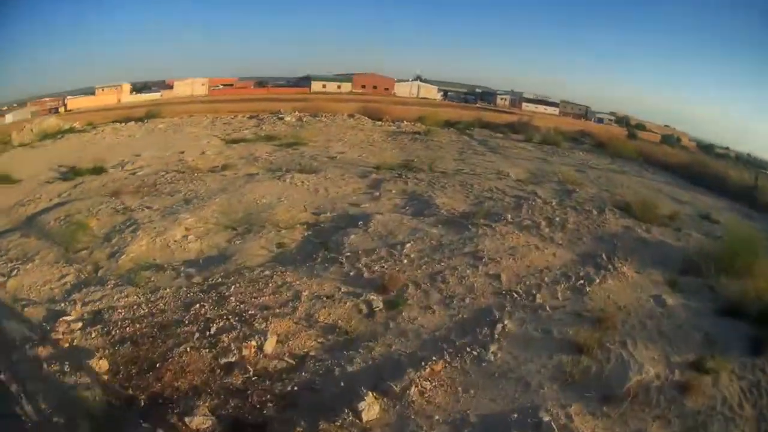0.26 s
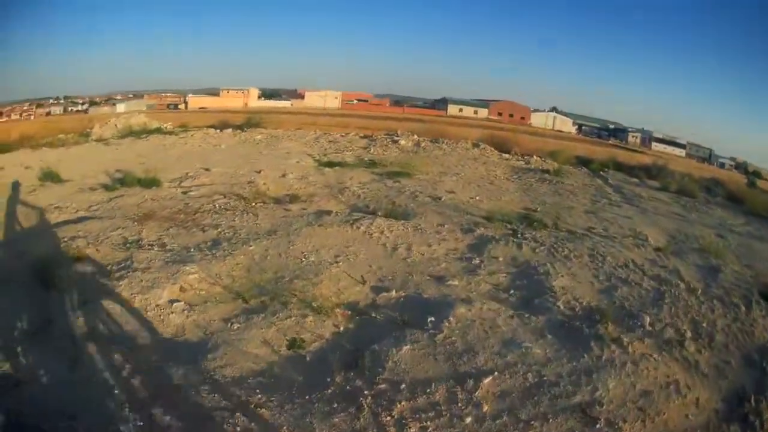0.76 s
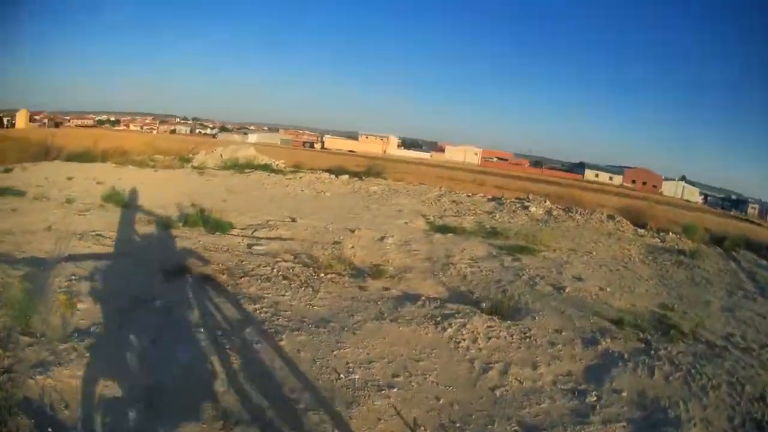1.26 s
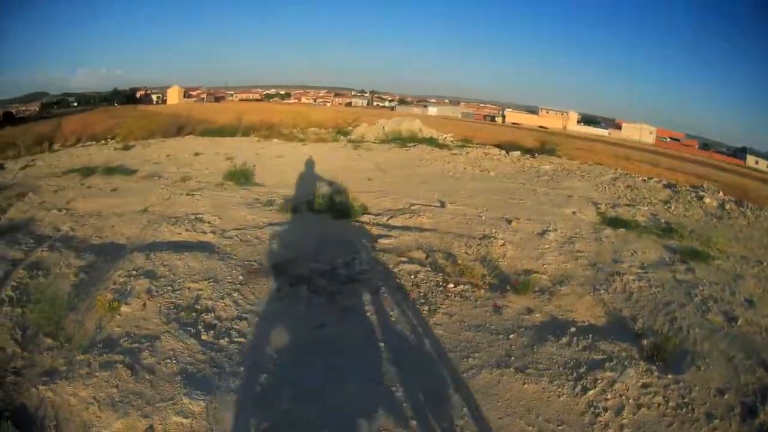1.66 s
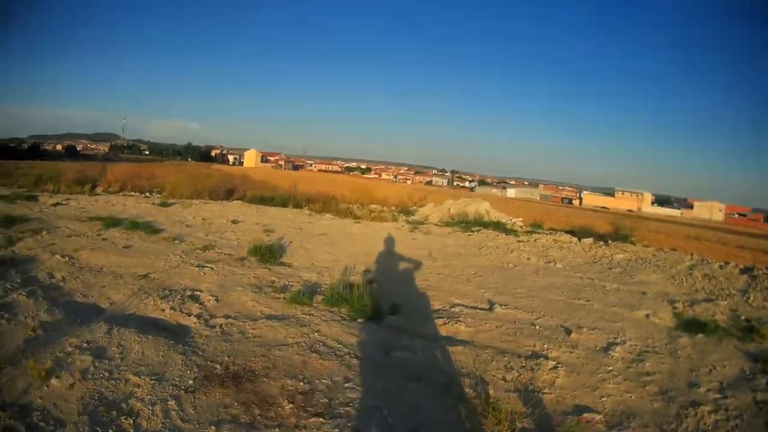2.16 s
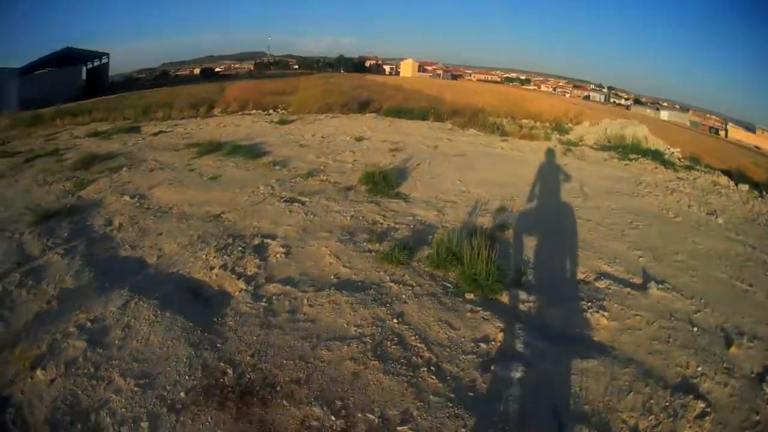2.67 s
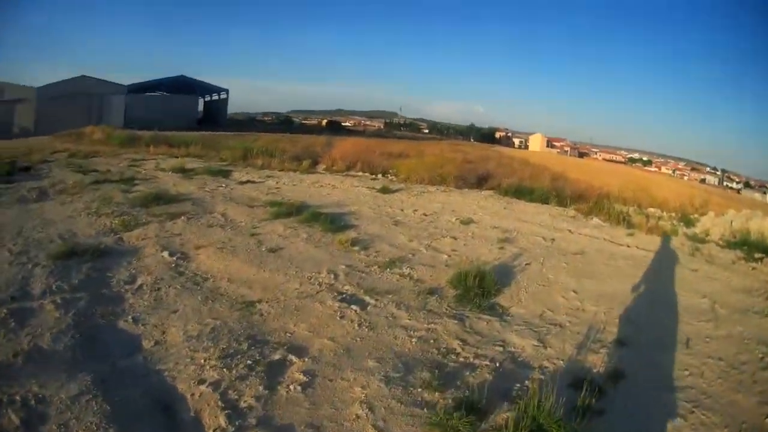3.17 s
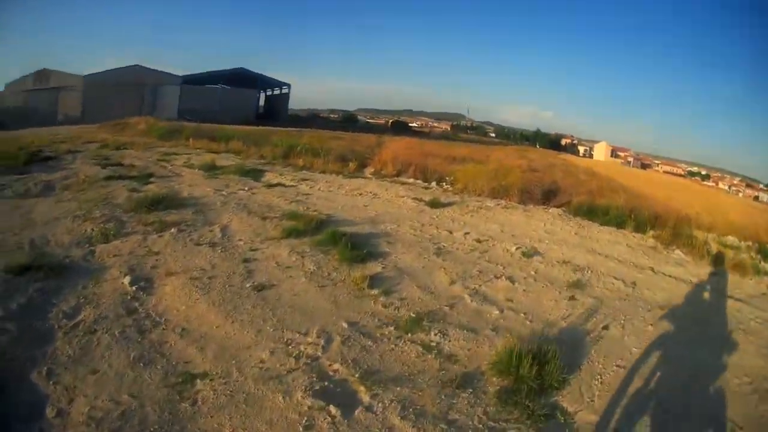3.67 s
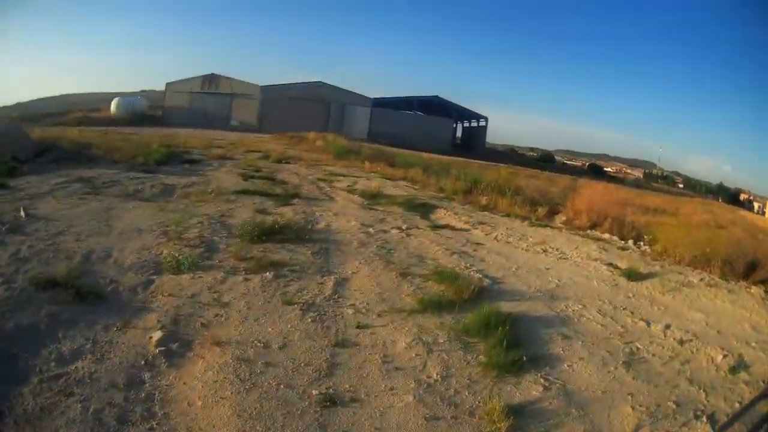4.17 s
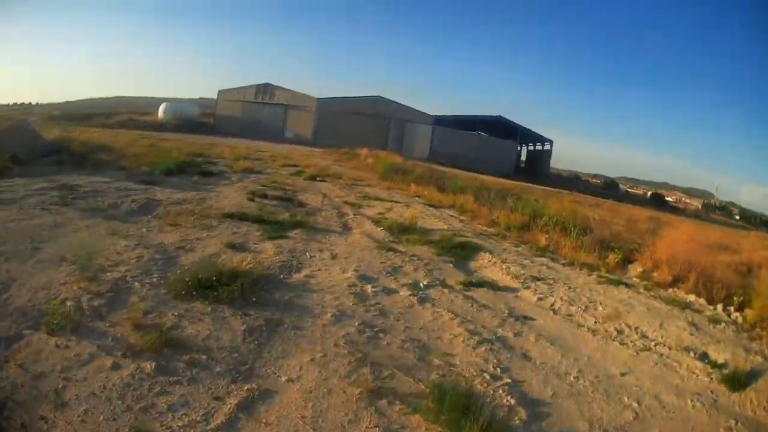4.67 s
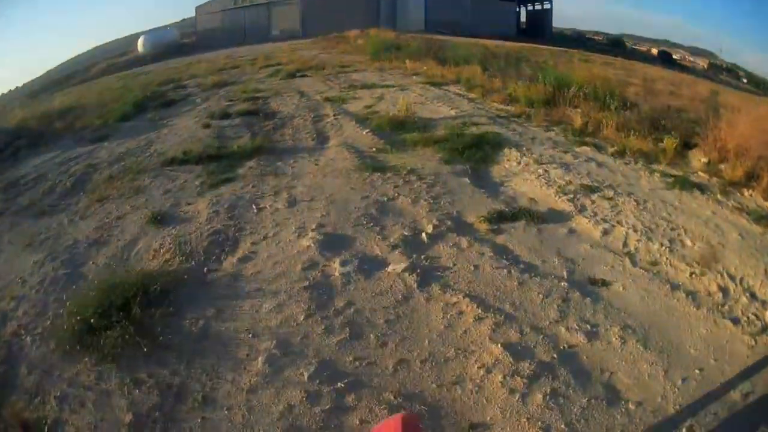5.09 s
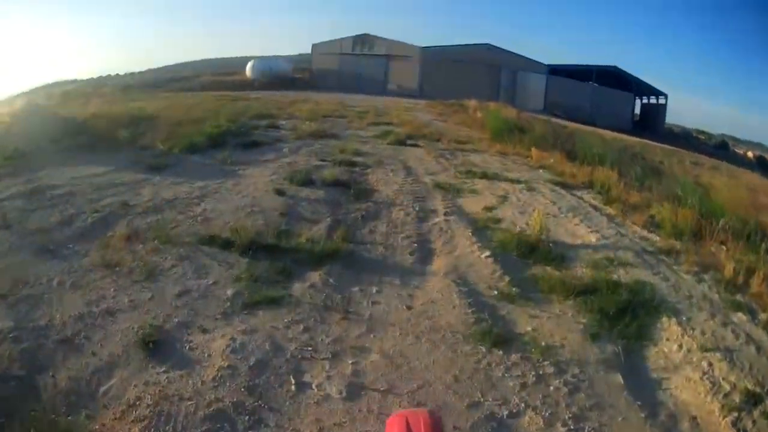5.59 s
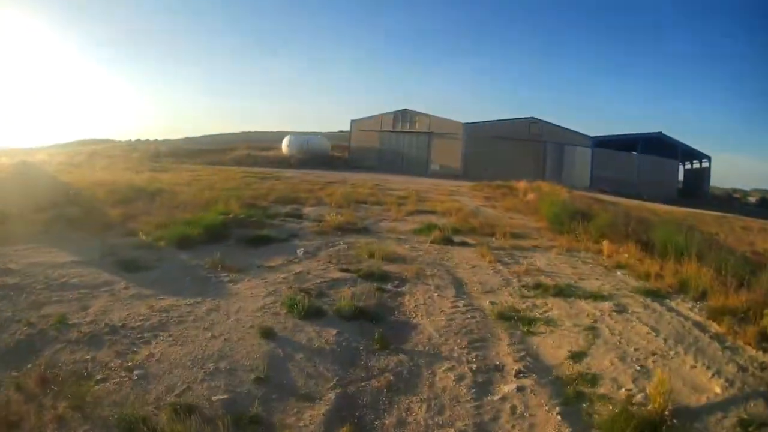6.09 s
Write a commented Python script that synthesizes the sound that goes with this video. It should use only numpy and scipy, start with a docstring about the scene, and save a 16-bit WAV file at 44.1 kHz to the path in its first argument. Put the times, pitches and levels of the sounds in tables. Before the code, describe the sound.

From a rider-worn microphone, a dirt bike's sparse pops become raspy, buzzing revs, with whirring throttle-off drops, suspension knocks and a final higher-gear pull.

```python
"""On rough dirt, a small two-stroke motorbike is heard from a microphone carried by its rider.
It coasts down to a popping idle, stumbles into life, revs up twice and coasts after each,
then pulls away in a higher gear. Each firing is a pressure step that rings the exhaust and rattles the
casing; ruts and knocks shake the microphone mount, and shaped noise makes the air that buffets it."""
import sys
import numpy as np
from scipy import signal
from scipy.fft import rfft, irfft
from scipy.io import wavfile
from scipy.ndimage import uniform_filter1d

SR = 44100
rng = np.random.default_rng(int(sys.argv[2]) if len(sys.argv) > 2 else 0)


def unload_audio(sound):
    """Save the sound as a 16-bit wav file, at the path given as the first command line argument."""
    columns = np.transpose(np.atleast_2d(sound))
    # keep every value between -1 and 1, then stretch to whole-number steps
    steps = np.round(np.clip(columns, -1, 1) * 32767)
    wavfile.write(sys.argv[1], SR, steps.astype(np.int16))


N = 279594
TIME = np.arange(N) / SR

# In every table of resonances, each row: pitch in Hz, width in Hz, strength in dB beside the other rows.

# The open throttle, one list for each pull.
# Each row: time in seconds, exhaust bark in dB before its trim, casing rattle in dB before its trim,
# crack of the exhaust port in dB.
THROTTLE_PULLS = [
    [(2.03, -45.5, -79, -82), (2.16, -45, -74.5, -73), (2.2, -41.5, -73, -75), (2.26, -40.5, -60, -64),
     (2.45, -40, -61.5, -63), (2.57, -39.5, -57, -61.5), (2.77, -43, -59, -67.5), (2.92, -39.5, -60, -77),
     (3.36, -37.5, -54, -59), (3.59, -40, -55.5, -57), (3.7, -41.5, -57.5, -57.5), (4.0, -35.5, -44, -56),
     (4.07, -33.5, -42.5, -55), (4.12, -32.5, -41.5, -56), (4.33, -31.5, -40.5, -52)],
    [(4.652, -30.5, -55, -51), (4.666, -33, -43.5, -50), (4.754, -31.5, -42.5, -59), (4.9, -34, -46, -45),
     (4.98, -34.5, -51.5, -62)],
    [(5.707, -33.5, -45.5, -56), (5.78, -39, -51, -58), (5.861, -39, -58.5, -56),
     (5.937, -40.5, -54.5, -55), (5.97, -41.5, -69, -60), (6.038, -40.5, -65, -54), (6.05, -33.5, -56, -55),
     (6.15, -36, -60, -53.5), (6.3, -37, -60.5, -56), (6.34, -34.5, -58, -58)],
]
# Turns that fire weakly: stumbling into life, and breaking up at top revs.
# Each row: start in seconds, end in seconds, one turn in this many misfires, which turn of the group, change in dB.
MISFIRES = [(2, 2.41, 2, 1, -20), (2.41, 2.53, 3, 0, -5), (2.53, 2.66, 3, 0, -14), (4.925, 5.02, 3, 0, -9)]
# The bark swells or sags as harmonics of the revs move across the silencer's resonance.
# Each row: time in seconds, change in dB, half length in seconds.
BARK_SWELLS = [(2.56, 1, .02), (2.83, 2, .02), (3.05, -1.5, .035), (3.2, -2.5, 0.018), (3.305, -1.5, .02),
               (3.44, -0.5, 0.018), (2.96, 3, 0.056), (3.135, 3, 0.049), (3.26, 2.5, 0.038),
               (3.39, 3, 0.04), (3.51, 2.5, 0.037), (3.71, 7.5, 0.091), (3.945, 5, 0.076),
               (4.072, -6, 0.016), (4.28, 2, 0.027), (4.685, 3.5, .02), (5.81, 1, .025),
               (5.925, 5.5, 0.021), (6.14, 1.5, 0.028), (6.18, -0.5, 0.015), (6.21, 1.5, 0.017),
               (6.258, 2.5, 0.032)]
# The pipe booms as the revs bring it into tune. Each row: turns per second in Hz, boom in dB.
PIPE_TUNE = [(55, -53), (72, -44.5), (100, -42), (118, -38), (131, -35), (150, -37.5), (190, -38)]
# How loudly the silencer's shell sings. Each row: time in seconds, level in dB.
SHELL_LEVEL = [(2.03, -60), (2.35, -51), (2.7, -47), (3.2, -42), (3.9, -49), (4.15, -48), (5.7, -45),
               (6.0, -47), (6.1, -42), (6.34, -51)]
# Resonances of the exhaust pipe, the airbox, the silencer and the silencer's shell.
PIPE = [(480, 110, 14.5), (580.4, 45, 13), (662, 77, 18.5), (633, 420, 1), (750, 90, 9), (889, 114, 4)]
AIRBOX = [(322, 98.5, -1), (456.4, 132, -2)]
SILENCER = [(975, 117, -1.5), (1043, 35, 2), (1108, 95, 2), (1284, 214, 0), (1330, 25, -17.5),
            (1399.6, 112, 9), (1511, 145, 0), (1743, 313, -10), (1730, 580, -33)]
SHELL = [(1408, 98, -0.5), (1453, 210, -13)]
# Resonances of gas in the ports, the crack of the opening port, the cooling fins and the engine casing.
PORTS = [(2004, 196, 2), (2202, 128, 0.5), (2425, 83, 0), (2544, 260, -8.5), (2890, 328, -8),
         (3122, 95, -6.5), (3376, 200, -8), (3610, 180, -15.5)]
CRACK = [(2470, 180, -1.5), (2929, 460, 1.5), (3124, 240, -3.5), (3400, 470, -4.5), (3834, 260, -15.5)]
FINS = [(3973, 89, 0.5), (4200, 900, -17), (4340, 72, -2), (4895, 110, 2.5), (4850, 900, -12)]
CASING = [(3930, 320, -26), (4670, 150, -27.5), (5470, 1600, -27), (5525, 68, -13.5), (6130, 1000, -18.5),
          (6350, 60, -9), (7140, 1100, -18.5), (7365, 180, -8), (7730, 430, -12.5), (8520, 120, -15),
          (8810, 1100, -23.5), (10200, 2300, -45)]
SPLUTTER_END_S = 2.66
SMOOTH_HZ = 121  # the firings are more even above this many turns a second
SCATTER_DB, SMOOTH_SCATTER_DB = 0.6, 0.4  # spread of the firings below and above that speed
BARK_TRIM_DB, RATTLE_TRIM_DB = 2, -0.5
RASP_DB, RASP_DB_PER_OCTAVE = -52, 4  # at 100 turns a second, bark -35 and rattle -55 before trims
RASP_PER_BARK, RASP_PER_RATTLE = 0.85, 0.15  # dB of rasp per dB of each
FINS_DB, FINS_PER_RATTLE = -55.5, 1.54  # level at a rattle of -41 before its trim, and dB per dB of rattle


def pulling(times, number):
    """Open throttle: firings ring pipe and silencer, gas cracks and rasps in the ports, metal rattles."""
    speed = crank_hz()
    chosen = [(start_s < times) & (times < end_s) for start_s, end_s, *_ in MISFIRES]
    losses = [db * (number % every == turn) for _, _, every, turn, db in MISFIRES]
    loss_db = np.select(chosen, losses)
    scatter_db = np.where(np.interp(times, TIME, speed) < SMOOTH_HZ, SCATTER_DB, SMOOTH_SCATTER_DB)
    # burnt gas left in the cylinder makes strong and weak firings come in runs
    chance = rng.standard_normal(2 ** 10)
    luck = .7 * chance + .55 * np.roll(chance, 1) + .4 * np.roll(chance, 2)
    kicks = pulses(times, amp(loss_db + luck[:len(times)] * scatter_db))

    # unburnt mixture makes the exhaust splutter at first
    splutter = (TIME < SPLUTTER_END_S) * gas(kicks, decay_s=.012, rough=.3)
    exhaust = ground(kicks + gas(kicks, decay_s=.018, rough=.16) + splutter)
    # the airbox drones at low revs and fades as the engine spins up
    drone_db = -5.5 - 14 * np.clip(speed / 90 - 1, 0, 1)
    boom = steady(ring(exhaust, PIPE)) + amp(drone_db) * steady(ring(exhaust, AIRBOX))
    bark = steady(drifting(reflect(exhaust), SILENCER, heat()), size=2000)
    shell = steady(drifting(exhaust + gas(kicks, decay_s=.02, rough=.46), SHELL, heat()))

    port_force = clatter(kicks, decay_s=.006, share=.7) + gas(kicks, decay_s=.007, rough=.45)
    rasp = steady(ring(port_force, PORTS))
    crack = steady(ring(kicks + gas(kicks, decay_s=.006, rough=.6), CRACK))
    fin_force = clatter(kicks, decay_s=.006, share=1) + gas(kicks, decay_s=.01, rough=.5)
    fins = steady(ring(fin_force, FINS))
    casing_force = clatter(kicks, decay_s=.018, share=3.1) + gas(kicks, decay_s=.02, rough=2.6)
    rattle = steady(ring(casing_force, CASING))
    hiss_modes = [(10200, 2000, 0), (12400, 3000, -2)]
    hiss = steady(ring(gas(kicks, decay_s=.0089, rough=1), hiss_modes))

    boom_db = np.interp(speed, *np.transpose(PIPE_TUNE))
    swell_db = swells(BARK_SWELLS)
    shell_db = curves(SHELL_LEVEL)[0]
    out = 0
    for table in THROTTLE_PULLS:
        start_s, end_s = table[0][0], table[-1][0]
        bark_db, rattle_db, crack_db = curves(table)
        bark_db = bark_db + swell_db
        rasp_db = RASP_DB + RASP_DB_PER_OCTAVE * np.log2(speed / 100)
        rasp_db = rasp_db + RASP_PER_BARK * (bark_db + 35) + RASP_PER_RATTLE * (rattle_db + 55)
        fins_db = FINS_DB + FINS_PER_RATTLE * (rattle_db + 41)
        # high hiss, its level set by a steep, capped rule from the rattle level
        hiss_db = np.minimum(-73 + 1.9 * (rattle_db + 45), -62)
        mix = amp(bark_db + BARK_TRIM_DB) * bark + amp(boom_db) * boom + amp(rasp_db) * rasp
        mix = mix + amp(rattle_db + RATTLE_TRIM_DB) * rattle + amp(crack_db) * crack
        mix = mix + amp(shell_db) * shell + amp(fins_db) * fins
        out = out + during(start_s, end_s, rise_s=.0015, fade_s=.015) * mix
        out = out + during(start_s, end_s, rise_s=.002, fade_s=.064) * amp(hiss_db) * hiss
    return out


# How fast the crankshaft turns before the flares are added. Each row: time in seconds, turns per second in Hz.
CRANK_SPEED = [(0.0, 89.26), (0.841, 69.663), (2.002, 54.22), (2.594, 86.73), (2.708, 74.3), (3.765, 95.7),
               (4.064, 120.7), (4.13, 131.2), (4.296, 135.6), (4.645, 120), (4.818, 170.5), (4.95, 193.9),
               (5.655, 152.9), (5.759, 94.94), (5.897, 68.8), (6.34, 79.8)]
# The rear wheel loses grip and the revs flare briefly.
# Each row: time in seconds, rise in Hz, half length in seconds.
GRIP_FLARES = [(2.924, 4.03, 0.066), (3.045, 4.7, 0.033), (3.239, 3.26, 0.038), (3.551, 7.7, 0.092),
               (5.911, 8.5, 0.033), (6.087, 11.9, 0.048), (6.253, 5.5, 0.052)]


def crank_hz():
    """Crankshaft speed, with its flares."""
    return curves(CRANK_SPEED)[0] + swells(GRIP_FLARES)


PULL_START_S = 2.027  # the turns are counted from here


def crank(jitter_turns):
    """Moments at which the exhaust port opens, once a turn, and the count of each turn."""
    turns = np.cumsum(crank_hz()) / SR
    turns -= np.interp(PULL_START_S, TIME, turns)
    number = np.arange(np.ceil(turns[0]), turns[-1])
    jitter = jitter_turns * rng.standard_normal(2 ** 10)[:len(number)]
    return np.interp(number + jitter, turns, TIME), number


# Pressure waves coming back along the exhaust. Each row: delay in seconds, share of the first wave.
PIPE_RETURNS = [(.00071, .3), (.00142, .3), (.00213, .15)]


def reflect(x):
    """The pressure wave comes back several times along the pipe."""
    return x + sum(share * np.interp(TIME - lag_s, TIME, x, left=0) for lag_s, share in PIPE_RETURNS)


# Hotter gas carries sound faster and lifts resonances of the exhaust. Each row: time in seconds, rise in percent.
GAS_HEAT = [(0, 6.5), (.35, -0.5), (2.0, 1.5), (3.35, 0), (3.75, 1.5), (4.05, 4.5), (4.3, 1.4), (4.8, 2.5),
            (5.75, 0.5), (6.34, 2.05)]


def heat():
    """Pitch ratio of the resonances that follow the heat of the gas."""
    return 1 + curves(GAS_HEAT)[0] / 100


# The echo off the ground moves with the suspension. Each row: time in seconds, delay in seconds before sway.
GROUND_LAG = [(2.0, 0.0047), (3.2, 0.0056), (3.9, 0.00482), (4.15, .00523), (4.7, .0052), (5.4, 0.0053),
              (6.1, 0.0049)]
GROUND_SWAY_S, GROUND_SHARE = .00009, 0.35  # random sway of the delay, and strength of the echo


def ground(x):
    """The echo off the ground shifts as the bike bounces, so single harmonics come and go."""
    lag_s = curves(GROUND_LAG)[0] + GROUND_SWAY_S * gusts(count=40)
    return x + GROUND_SHARE * np.interp(TIME - lag_s, TIME, x, left=0)


# The throttle is shut and the engine spins down.
# Each row: start in seconds, end in seconds, whirr in dB at the start, then beside the whirr: bright edge in dB
# and rattle in dB at the start; how fast the rattle fades against the whirr in dB per second;
# and chain slap in dB beside the whirr.
OVERRUNS = [(4.344, 4.684, -40, -18.5, -18.5, 93, -21), (5.019, 5.705, -36, -12.5, -16.5, 9.5, -14.5)]
# Resonances of the crankcase.
CRANKCASE = [(171, 770, -8), (320, 96, 4), (530, 300, -10), (640, 220, 6.5), (862, 148, 5.5),
             (1086, 71, 15.5), (1383.6, 292, 13), (1674, 200, 1), (1465, 250, -15.5), (650, 70, -0.5)]
WHIRR_FADE_DB_PER_S = 4.5  # the whole overrun fades at this rate


def overrun(times, number):
    """Shut throttle at speed: the piston pumps without firing and the crankcase whirrs."""
    # with no load the crank wobbles against the slack chain
    times = times + .000016 * rng.standard_normal(2 ** 10)[:len(times)]
    # every other turn is weaker
    uneven_db = -1.6 * (number % 2) + 0.76 * rng.standard_normal(2 ** 10)[:len(times)]
    kicks = pulses(times, amp(uneven_db))
    pumping = ground(kicks + gas(kicks, decay_s=.008, rough=.48))
    # the small crankcase radiates no deep bass
    no_bass = signal.butter(4, 145, "high", fs=SR, output="sos")
    whirr = steady(signal.sosfilt(no_bass, ring(pumping, CRANKCASE)))
    edge_force = clatter(pumping, decay_s=.004, share=.6) + gas(kicks, decay_s=.012, rough=.95)
    edge = steady(ring(edge_force, PORTS))
    chain = [(3630, 2250, -6.5), (5470, 1000, -14), (6030, 1000, -4.5),
             (7410, 280, -2), (7850, 30, 2), (8570, 770, -17.5)]
    chain_force = clatter(kicks, decay_s=.012, share=2) + gas(kicks, decay_s=.024, rough=2.8)
    rattle = steady(ring(chain_force, chain))
    out = 0
    for start_s, end_s, whirr_db, edge_db, rattle_db, fade_db_per_s, slap_db in OVERRUNS:
        age_s = np.maximum(TIME - start_s, 0)
        mix = whirr + amp(edge_db) * edge + amp(slap_db) * slaps()
        mix = mix + amp(rattle_db - fade_db_per_s * age_s) * rattle
        level = amp(whirr_db - WHIRR_FADE_DB_PER_S * age_s)
        out = out + during(start_s, end_s, rise_s=.036, fade_s=.0098) * level * mix
    return out


# Resonances of the guide that the slack chain hits.
CHAIN_GUIDE = [(2034, 110, 2.5), (2030, 650, -12), (2400, 120, -0.5), (2576, 130, -2), (3040, 140, -19)]


def slaps(count=1200):
    """The slack chain slaps its guide at random, with a spread of 1 dB."""
    times = rng.random(count) * TIME[-1]
    sizes = amp(1 * rng.standard_normal(count))
    return steady(ring(pulses(times, sizes), CHAIN_GUIDE), size=5000)


# Unfired puffs while coasting down to idle. Each row: time in seconds, bark in dB before weak burns.
COAST_BARK = [(0, -50), (.16, -45), (.22, -55), (.76, -72), (.93, -61), (1.4, -75.5), (1.77, -90),
              (2.03, -58)]
# Half-lit turns that swell the puffs. Each row: time in seconds, rise in dB.
WEAK_BURNS = [(.325, 11.5), (0.406, 15), (0.482, 13.5), (.557, 11.5), (0.622, 11), (1.15, 14)]
# How loudly the tyre knobs hum. Each row: time in seconds, level in dB.
TYRE_LEVEL = [(0, -59.5), (.3, -62), (.6, -56), (1.0, -76.5), (2.0, -93)]
# Resonances that slow gas rings in the exhaust: the bark and the boom.
IDLE_BARK = [(1200, 340, -11), (1386, 530, -11), (1386, 173, 3.5)]
IDLE_BOOM = [(553, 238, -3), (635, 73, 3), (740.5, 85, -4)]
# Resonances of loose plastic panels.
PANELS = [(1140, 300, 4), (1760, 360, -2), (2060, 300, 0)]
WEAK_BURN_S = 0.02  # half length
COAST_BOOM_DB, COAST_BOOM_SHARE = -55.5, 0.64  # boom at a bark of -46 dB, and dB per dB of bark
COAST_RASP_DB, COAST_RASP_FADE_DB_PER_S = -54, 72  # gas rasp dies away as the revs fall
CHAIN_DB = -95.5  # faint hiss of the chain
TYRE_HZ, TYRE_WIDTH_HZ, TYRE_FALL_OCTAVES_PER_S = 395, 177, 0.76  # starting pitch, falling as the bike slows
JOLT_S, JOLT_DB, JOLT_FADE_S = .9, -64.5, 0.071  # a hard rut sets loose panels chattering


def coasting(times):
    """Slow unfired puffs pass through the exhaust, and the tyre knobs hum over the ground."""
    kicks = pulses(times, amp(1.1 * rng.standard_normal(2 ** 10)[:len(times)]))
    puffs = clatter(kicks, decay_s=.02, share=.8) + gas(kicks, decay_s=.03, rough=.65)
    bark = steady(drifting(reflect(puffs), IDLE_BARK, heat()))
    boom = steady(ring(puffs, IDLE_BOOM))
    rasp_modes = [(960, 990, 15), (2070, 420, 12), (2960, 800, -19), (7400, 7200, -25)]
    rasp = steady(ring(clatter(puffs, decay_s=.028, share=.52), rasp_modes))
    tyre_ratio = 2 ** (-TYRE_FALL_OCTAVES_PER_S * np.minimum(TIME, PULL_START_S))
    tyre = steady(drifting(noise(), [(TYRE_HZ, TYRE_WIDTH_HZ, 0)], tyre_ratio))
    chain = steady(ring(noise(), [(3330, 6400, -1), (7450, 1400, -0.24)]))
    panels = during(JOLT_S, JOLT_S, rise_s=.004, fade_s=JOLT_FADE_S) * steady(ring(noise(), PANELS))

    bark_db = curves(COAST_BARK)[0] + swells([(s, db, WEAK_BURN_S) for s, db in WEAK_BURNS])
    boom_db = COAST_BOOM_DB + COAST_BOOM_SHARE * (bark_db + 46)
    rasp_db = COAST_RASP_DB - COAST_RASP_FADE_DB_PER_S * TIME
    mix = amp(bark_db) * bark + amp(boom_db) * boom + amp(rasp_db) * rasp
    mix = mix + amp(curves(TYRE_LEVEL)[0]) * tyre + amp(CHAIN_DB) * chain + amp(JOLT_DB) * panels
    return during(0, PULL_START_S, rise_s=.01, fade_s=.00606) * mix


# Single firings at idle.
# Each row: time in seconds, silencer bark peak in dB before the trim, pipe boom peak in dB before the trim.
IDLE_POPS = [(0.8155, -58, -56.5), (0.8873, -48.5, -41.5), (0.9594, -52.5, -47), (1.0196, -52.5, -48.5),
             (1.0941, -55.5, -53), (1.157, -44.5, -50), (1.2186, -56, -55), (1.281, -61, -54),
             (1.3447, -50.5, -47.5), (1.4087, -62, -58), (1.4402, -51, -47), (1.5063, -60.5, -56),
             (1.5398, -61, -57), (1.6736, -73, -65), (1.7075, -75, -75), (1.7419, -76, -64),
             (1.8112, -53, -54.5), (1.8822, -49.5, -53), (1.954, -40, -48.5)]
POP_TRIM_DB = 3.5  # raises bark and boom
POP_BUZZ_DB, POP_BUZZ_S = -33, .06  # casing buzz beside the bark before its trim, and its decay


def pops(size=4096):
    """Stray firings at idle: a crack and a puff of gas through the whole exhaust, and a buzz of the casing."""
    out, t = np.zeros(N), TIME[:size]
    for s, bark_db, boom_db in IDLE_POPS:
        push = (t == 0) + 0.05 * rng.standard_normal(size) * np.exp(-t / 0.019)
        bark = ring(push, IDLE_BARK + [(1146, 81, -1)]) + amp(-35) * ring(push, CRACK)
        boom = ring(push, IDLE_BOOM) + amp(-17) * ring(push, AIRBOX)
        buzz = ring(rng.standard_normal(size) * np.exp(-t / POP_BUZZ_S), CASING)
        add(out, s, peak(bark, bark_db + POP_TRIM_DB))
        add(out, s, peak(boom, boom_db + POP_TRIM_DB))
        add(out, s, peak(buzz, bark_db + POP_BUZZ_DB))
    return out


# Ruts that jolt the microphone; the last column is played by the wind.
# Each row: time in seconds, rumble of the mount in dB, rumble decay in seconds, air buffet in dB.
RUT_JOLTS = [(0.888, -57, 0.017, -43.5), (0.987, -52, 0.022, -69), (1.104, -50.5, 0.018, -57),
             (1.162, -65, 0.0041, -49), (1.413, -52.5, 0.022, -49.5), (2.206, -43, 0.032, -43.5),
             (3.747, -54, 0.044, -50), (4.178, -49, 0.059, -55), (4.392, -63, 0.032, -46.5),
             (4.606, -34.5, 0.042, -36), (5.298, -37, 0.034, -44), (5.997, -69.5, 0.23, -51)]
# Suspension knocks. Each row: time in seconds, clack peak in dB, top of the clack in Hz, thud peak in dB.
KNOCKS = [(0.892, -36.5, 1580, -47), (1.637, -69, 1200, -47), (2.143, -42, 2580, -37),
          (4.521, -30, 1848, -54), (4.593, -17.5, 6000, -18), (5.27, -30.5, 1700, -32)]
# Resonances of the microphone's mount and housing.
MOUNT = [(132, 55, -9), (171.6, 56, -3.5), (235, 160, -19.5)]
HOUSING = [(457, 330, -5.5), (1170, 230, 6), (1517, 400, -1.5), (2030, 500, 0), (2300, 920, -9.5),
           (4530, 2100, -32.5)]


def ruts(size=4096):
    """The microphone mount rumbles over ruts; at the knocks the suspension clacks and the mount thuds."""
    shake = sum(amp(db) * np.exp(-np.abs(TIME - s) / length_s) for s, db, length_s, _ in RUT_JOLTS)
    # a faint rumble stays between the ruts
    out = (shake + amp(-72)) * steady(ring(noise(), MOUNT), size=700)
    t = TIME[:size]
    for s, clack_db, top_hz, thud_db in KNOCKS:
        # a contact that builds over a few milliseconds, then loose parts buzzing briefly
        shape = (t / 0.004) ** 3 * np.exp(-t / 0.0018) + 0.004 * np.exp(-t / 0.035)
        contact = shape * rng.standard_normal(size)
        contact = signal.sosfilt(signal.butter(4, top_hz, fs=SR, output="sos"), contact)
        add(out, s - .002, peak(ring(contact, HOUSING), clack_db))
        add(out, s + .0054, peak(response(MOUNT), thud_db))
    return out


# Low resonances that shape the moving air.
BUFFET = [(14.1, 63, -1), (37.5, 9.1, -8.5), (97, 86, -19)]
BUFFET_S, BREEZE_DB, GUST_DB = 0.046, -63.5, 3  # decay of a buffet; level and swing of the air between ruts


def wind():
    """Air buffets the microphone at every jolt, over a light breeze and a faint hiss."""
    jolts = sum(amp(db) * np.exp(-np.abs(TIME - s) / BUFFET_S) for s, _, _, db in RUT_JOLTS)
    breeze = amp(BREEZE_DB + GUST_DB * gusts())
    air = steady(ring(noise(), BUFFET), size=5000)
    return (jolts + breeze) * air + amp(-100) * noise()


def gusts(count=30):
    """Slow random swing to either side of zero, spread near 1."""
    return np.interp(TIME, np.linspace(0, TIME[-1], count), rng.standard_normal(count))


def pulses(times, sizes):
    """Short pressure kicks, each shared between two neighbouring samples."""
    place = np.clip(times * SR, 0, N - 2)
    i = place.astype(int)
    later = place - i
    return np.bincount(i, sizes * (1 - later), N) + np.bincount(i + 1, sizes * later, N)


def gas(kicks, decay_s, rough):
    """A dying puff of turbulence after each pulse; successive puffs add in power."""
    keep = np.exp(-2 / (decay_s * SR))
    power = signal.lfilter([1 - keep], [1, -keep], kicks)
    return rough * np.sqrt(power) * noise()


def clatter(kicks, decay_s, share, size=2048):
    """Scattering in pipes and metal: the same dense tail after every pulse."""
    tail = rng.standard_normal(size) * np.exp(-TIME[:size] / decay_s)
    return kicks + share * signal.fftconvolve(kicks, tail / np.linalg.norm(tail))[:N]


def response(modes, size=8192):
    """Impulse response of steep-sided resonances, with its energy as early as possible."""
    f = np.arange(size // 2 + 1) * SR / size
    # each resonance alone is 9 dB down at the edges of its width
    power = sum(amp(db) ** 2 / (1 + (2 * (f - hz) / width) ** 2) ** 3 for hz, width, db in modes)
    # folding the cepstrum forward in time lets nothing sound before the blow
    cepstrum = irfft(np.log(power) / 2)
    cepstrum[1:size // 2] *= 2
    cepstrum[size // 2 + 1:] = 0
    return irfft(np.exp(rfft(cepstrum)))


def ring(x, modes):
    """Pass a force through resonances."""
    return signal.fftconvolve(x, response(modes))[:len(x)]


def drifting(x, modes, ratio):
    """Pass a force through resonances whose pitch moves by a ratio, on a clock that runs faster or slower."""
    clock = np.cumsum(ratio)
    ticks = np.arange(int(clock[-1]) + 2)
    rung = ring(np.interp(ticks, clock, x), modes)
    return np.interp(clock, ticks, rung)


def steady(x, size=3000):
    """Unit level over a few engine turns, leaving single firings uneven."""
    power = uniform_filter1d(uniform_filter1d(x ** 2, size), size)
    return x / np.sqrt(np.maximum(power, 0) + 1e-6 * np.mean(x ** 2))


def amp(db):
    """Decibels to gain."""
    return 10 ** (np.asarray(db) / 20)


def curves(table):
    """Each column of a timed table, joined by straight lines."""
    s, *columns = np.transpose(table)
    return [np.interp(TIME, s, c) for c in columns]


def swells(table):
    """Sum of smooth humps, each with a time, height and half length."""
    return sum(height * np.exp(-((TIME - s) / length_s) ** 2) for s, height, length_s in table)


def during(start_s, end_s, rise_s, fade_s):
    """One between two times, rising before and fading after."""
    before, after = (TIME - start_s) / rise_s, (end_s - TIME) / fade_s
    return np.exp(np.minimum(0, np.minimum(before, after)))


def peak(x, db):
    """Scale to a peak level."""
    return x * amp(db) / np.abs(x).max()


def noise():
    """White noise."""
    return rng.standard_normal(N)


def add(out, s, x):
    """Mix a short sound in at a time."""
    i = int(s * SR)
    out[i:i + len(x)] += x[:N - i]


def scene():
    """Engine, ground and air at the microphone."""
    times, number = crank(jitter_turns=.0009)
    engine = pulling(times, number) + overrun(times, number) + coasting(times) + pops()
    return (engine + ruts() + wind())[None]


def record(dry):
    """The microphone cuts the treble steeply above 15500 Hz."""
    return signal.sosfilt(signal.ellip(8, .2, 70, 15500, fs=SR, output="sos"), dry)


dry = scene()
out = record(dry)
unload_audio(out)
```